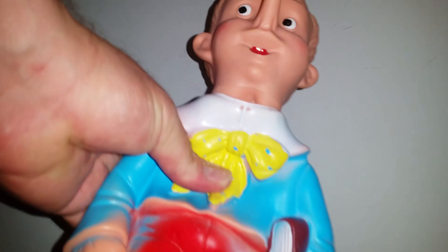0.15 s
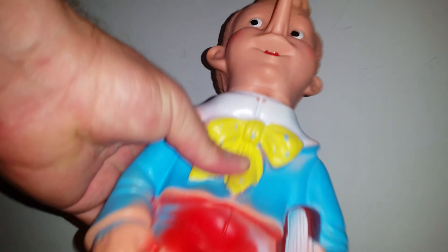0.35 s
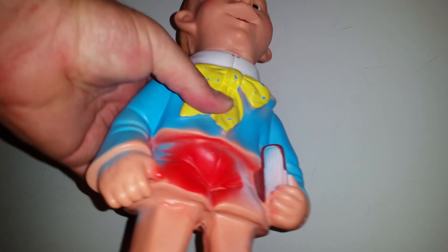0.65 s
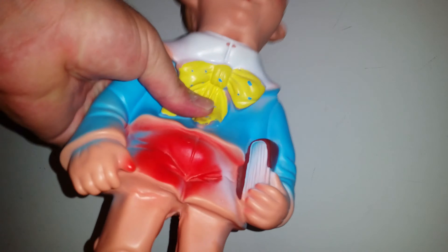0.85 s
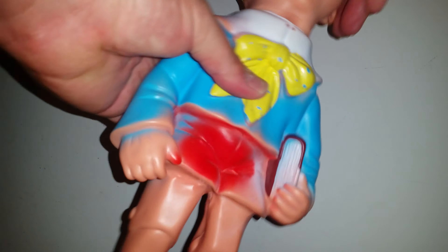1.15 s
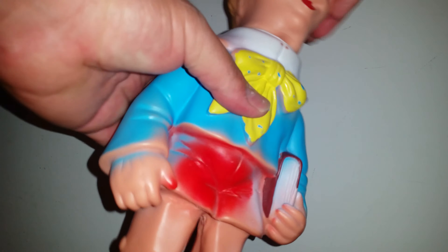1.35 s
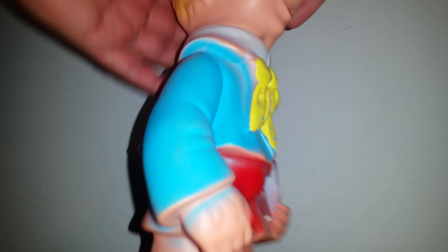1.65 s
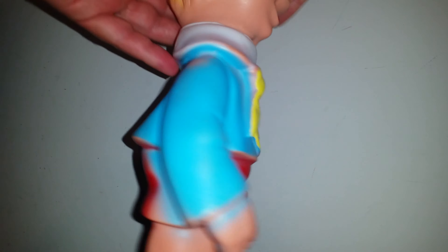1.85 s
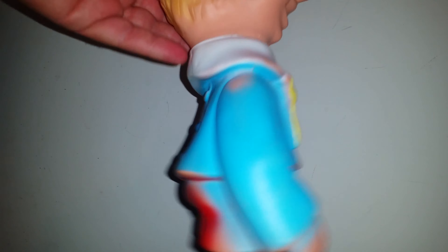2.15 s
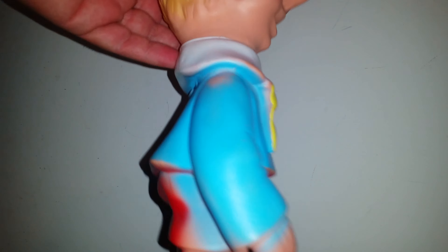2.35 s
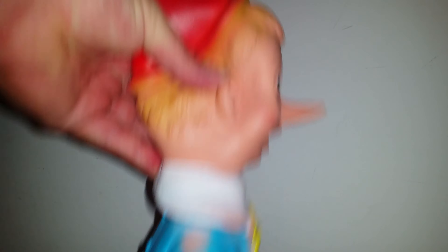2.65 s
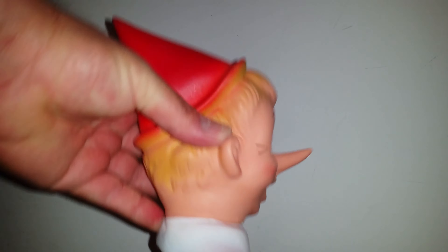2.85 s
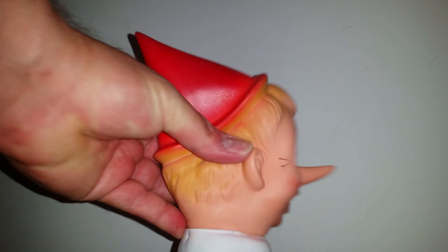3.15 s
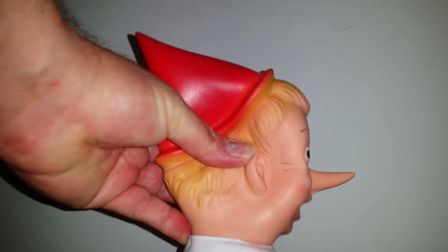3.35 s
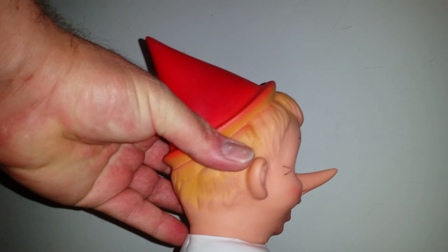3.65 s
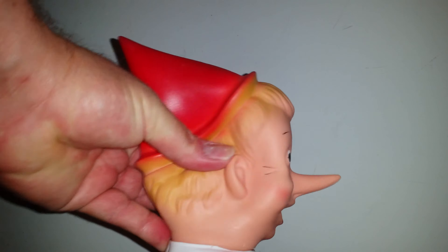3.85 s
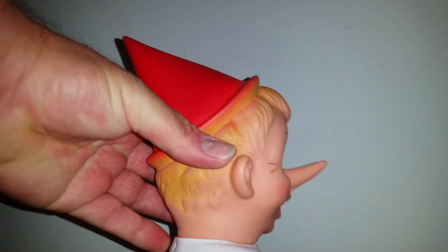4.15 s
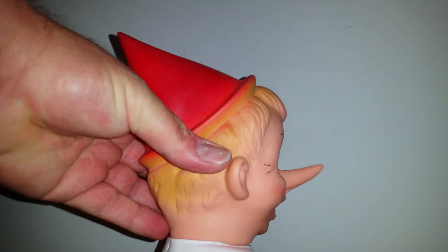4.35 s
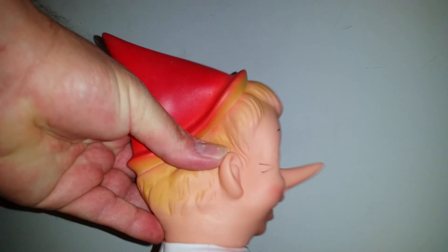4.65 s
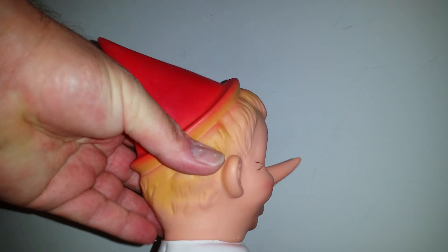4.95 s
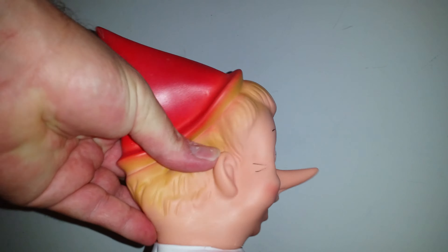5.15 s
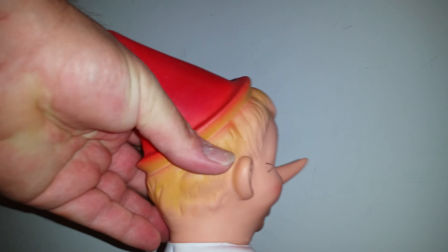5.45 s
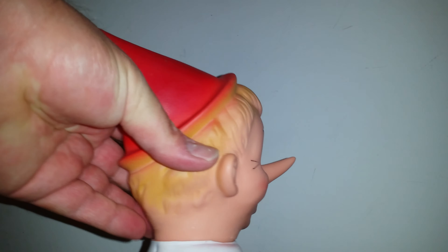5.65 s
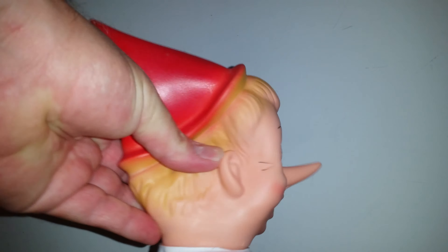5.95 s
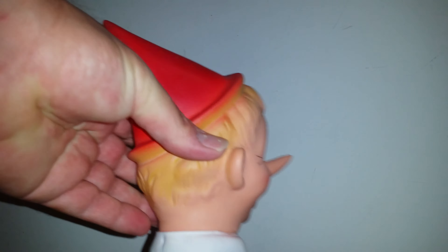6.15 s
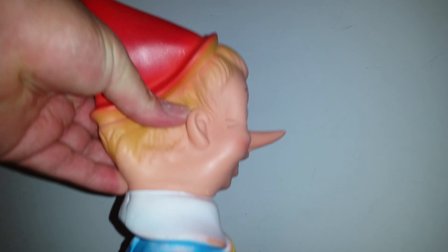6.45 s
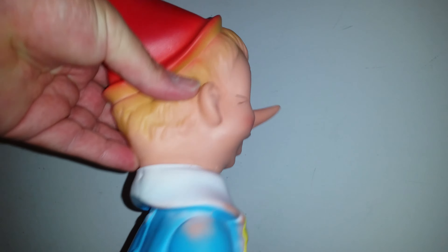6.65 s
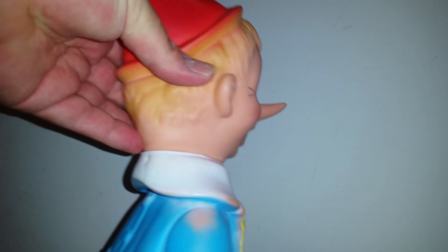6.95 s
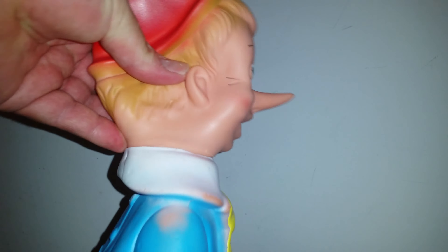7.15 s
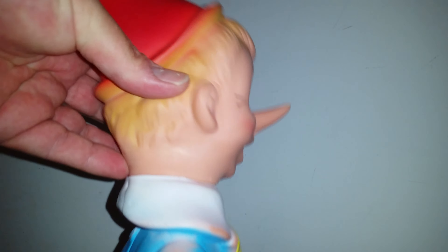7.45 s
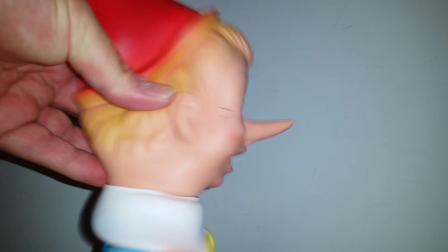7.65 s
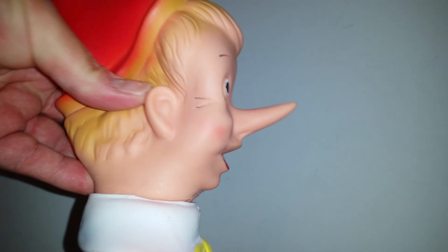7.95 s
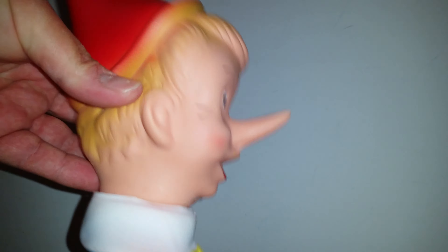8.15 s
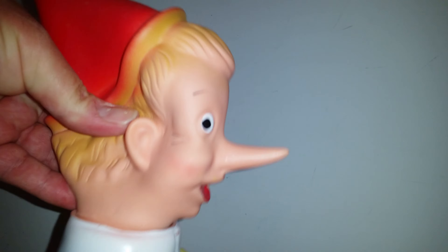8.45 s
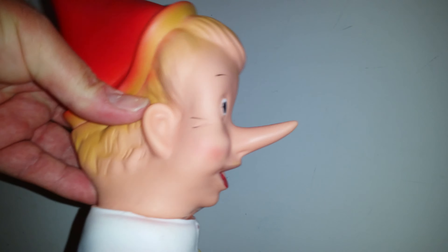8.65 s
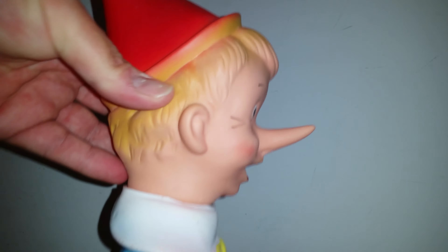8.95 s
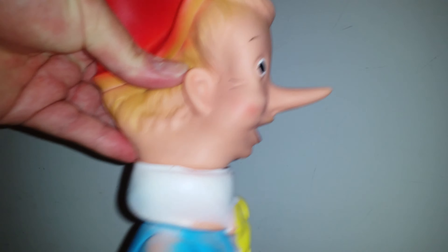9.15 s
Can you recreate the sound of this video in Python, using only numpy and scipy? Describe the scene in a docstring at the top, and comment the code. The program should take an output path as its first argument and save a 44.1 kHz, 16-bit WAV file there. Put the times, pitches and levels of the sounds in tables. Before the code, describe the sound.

A hand repeatedly squeezes a hollow rubber doll close to the microphones. About every two thirds of a second a short, raspy, hissing squeal jumps up in pitch and drops, followed at once by a lower, smoother whistle as air is sucked back. Squeaks in the middle are duller and more nasal, then turn shrill again. A few soft thumps and low grip rumble sit over faint room air and a thin hum.

```python
"""A hollow rubber doll is squeezed again and again in a small quiet room, heard by two close microphones.
Its reed is a stack of partials with chopped air noise: high and rough as air is pressed out, lower and
cleaner as the doll refills. A second tone arches over some strokes, and noise stirs in the hollow.
Decaying noise bursts are bumps on the rubber, and low noise is the shifting grip.
Behind them lie room air, as stereo noise, and an appliance's faint hum, as a sine."""
import sys
import numpy as np
from scipy import signal
from scipy.fft import rfft, irfft, next_fast_len
from scipy.io import wavfile
from scipy.ndimage import uniform_filter1d

SR = 44100
rng = np.random.default_rng(int(sys.argv[2]) if len(sys.argv) > 2 else 0)


def unload_audio(sound):
    """Save the sound as a 16-bit wav file, at the path given as the first command line argument."""
    columns = np.transpose(np.atleast_2d(sound))
    # keep every value between -1 and 1, then stretch to whole-number steps
    steps = np.round(np.clip(columns, -1, 1) * 32767)
    wavfile.write(sys.argv[1], SR, steps.astype(np.int16))


N = 409688  # length in samples
TOP_HZ = 15900  # upper edge of the sound


def undb(db):
    """Decibel law: 20 dB is a tenfold amplitude."""
    return 10 ** (np.asarray(db) / 20)


def rms(x):
    """Effective value: the root of the mean square."""
    return np.sqrt(np.mean(x ** 2) + 1e-20)


def ramp(x):
    """Saturation: hold a value between 0 and 1."""
    return np.clip(x, 0, 1)


def shape(hz, points):
    """Spectral envelope: read (frequency [Hz], level [dB]) points on a log-frequency axis."""
    point_hz, db = np.transpose(points)
    return np.interp(np.log(hz + 1e-3), np.log(point_hz), db)


def coloured(points, size):
    """Spectral shaping: white noise filtered to an envelope, with rms 1."""
    n = next_fast_len(size)
    gain = undb(shape(np.fft.rfftfreq(n, 1 / SR), points))
    x = irfft(rfft(rng.standard_normal(n)) * gain, n)[:size]
    return x / rms(x)


def wander(t, rate):
    """Random modulation, from slow drift to fast roughness: random values joined by lines, rate a second."""
    knots = np.arange(t[0], t[-1] + 1 / rate, 1 / rate)
    return np.interp(t, knots, rng.standard_normal(len(knots)))


def add(track, start, x):
    """Superposition: mix a sound into a track at a time in seconds."""
    i = max(int(start * SR), 0)
    track[i:i + len(x)] += x[:max(N - i, 0)]


# spectrum of the still room air: (frequency [Hz], level [dB per Hz])
AIR_SPECTRUM = [(15, -48), (25, 2), (286, -0.5), (462, -10), (709, -4), (1060, -15.5), (1540, -9.5),
                (1860, -29), (4040, -17.5), (4750, -30), (15000, -22)]
AIR_DB = -53.5  # of the common and of the opposed part
HUM_HZ, HUM_DB = 248.2, -60


def background():
    """Spatial coherence: room air is alike at both microphones in the bass; a thin hum is common to both."""
    t = np.arange(N) / SR
    mid, side = coloured(AIR_SPECTRUM, N), coloured(AIR_SPECTRUM, N)
    side = signal.sosfilt(signal.butter(1, 350, "high", fs=SR, output="sos"), side)
    hum = np.sqrt(2) * np.sin(2 * np.pi * HUM_HZ * t) * undb(HUM_DB + 2.0 * wander(t, 4.7))
    return undb(AIR_DB) * (mid + side * np.array([[1], [-1]])) + hum


GRIP_DB, GRIP_SPREAD_DB = -60.5, 3.5  # middle level of the grip's rumble and its random spread
# broad hump of a bump around its ring pitch: (frequency / ring pitch [ratio], level [dB per Hz])
BUMP_HUMP = [(.25, -25), (.8, 0), (1.25, 0), (2, -28), (10, -70)]
# the hand bumps the rubber: (time [s], level [dB], ring pitch [Hz], time to decay by 60 dB [s])
HAND_BUMPS = [(0.224, -38, 120, 0.14), (0.329, -31.5, 134, 0.063), (0.654, -36, 700, 0.072),
              (0.656, -31.5, 78, 0.17), (0.66, -32, 175, 0.095), (1.516, -36, 130, 0.073),
              (4.439, -40.5, 175, 0.25), (4.450, -41, 470, 0.15), (5.391, -25.5, 457, 0.089),
              (8.681, -41, 121, 0.11)]


def hand():
    """Damped resonance: dull bumps die away on the hollow rubber over the low rumble of the shifting grip."""
    out, t = np.zeros(N), np.arange(SR // 4) / SR
    for start, db, hz, t60 in HAND_BUMPS:
        ring = coloured([(hz * ratio, ring_db) for ratio, ring_db in BUMP_HUMP], len(t))
        onset = 1 - np.exp(-t / 0.00058)
        add(out, start, ring * undb(db - 60 * t / t60) * onset)
    grip = coloured([(25, -21), (80, 4.5), (170, 1), (300, -18.5), (520, -1.5), (1000, -23), (4000, -62)], N)
    return out + grip * undb(GRIP_DB + GRIP_SPREAD_DB * wander(np.arange(N) / SR, 14))


SLACK_HZ, TAUT_HZ = 787, 1545  # pitch of the reed at the weakest and at full pressure
CHOKE_DB = -38  # at full pressure a swing smaller than this is pressed shut
HELD_UNREST = 0.26  # share of the shaking that remains while the pitch is held
FLEX_DB, FLEX_PRESSURE_DB = 1.6, 2.3  # random spread of each partial, and its growth under pressure
# lowest partials as the doll is turned, re treble: (time [s], fundamental level [dB], octave level [dB])
LOW_COLOUR = [(1.3, -6, -14), (2.1, -10.5, -14.5), (2.75, -5.5, -14.5), (3.3, -2.5, -6.5), (5.4, -2, -6.5),
              (6.0, -3.5, -7.5), (6.6, -3.5, -9.5), (7.3, -1.5, -15), (8.3, -2.5, -9), (9.1, -3, -10.5)]
# air rushing through the slit: (frequency [Hz], level [dB per Hz])
RUSH_SPECTRUM = [(400, -52.5), (900, -2), (2500, 6), (4300, -4), (5600, 5.5), (6800, -14), (8000, 23),
                 (9300, -4), (12500, 10), (15500, -18)]


def squeak(start, pitch, loud, reed, nasal_db, rasp, spit_db, waver, flutter, rush_db, low_power,
           low_db=0, shake=0):
    """Reed oscillation: one stroke of air drives a stack of partials and a rush chopped once a cycle."""
    t = start + np.arange(len(pitch)) / SR
    swing = undb(loud)
    hz = uniform_filter1d(pitch, size=len(t) // 20)  # the air inside cushions every change
    ends = np.clip(np.minimum(t - t[0], t[-1] - t) / 0.0013, 0, 1)
    pressure = np.clip((hz - SLACK_HZ) / (TAUT_HZ - SLACK_HZ), .05, 1)

    # the reed is steadier when slack or taut, and shakes on the way between, most while it glides
    glide = np.abs(np.gradient(hz))
    gliding = HELD_UNREST + (1 - HELD_UNREST) * np.sqrt(glide / glide.max())
    unrest = 0.458 + 4.82 * pressure * (1 - pressure) * gliding
    hz = hz * (1 + unrest * (waver * wander(t, 110.1) + rasp * wander(t, 900)))
    phase = 2 * np.pi * np.cumsum(hz) / SR

    # each partial swells and fades on its own as the rubber flexes, more so under pressure
    k = np.arange(3, 21)[:, None]
    flex_spread = FLEX_DB + FLEX_PRESSURE_DB * np.sqrt(pressure)
    flex_db = flex_spread * np.array([wander(t, 44.6) for _ in k])
    partials = undb(shape(k * hz, reed) + flex_db) * np.sin(k * phase) * (k * hz < TOP_HZ)
    high = k * hz > 5700
    treble = (partials * high).sum(0)
    middle = (partials * ~high).sum(0)
    treble /= np.sqrt(uniform_filter1d(treble ** 2, size=400) + 1e-9)

    when, *columns = np.transpose(LOW_COLOUR)
    tone, octave = undb([np.interp(t.mean(), when, c) for c in columns]) * undb(low_db)
    low = np.sqrt(2) * (tone * np.sin(phase) + octave * np.sin(2 * phase))
    low += undb(nasal_db) * middle / rms(middle)
    # a rough swing is also uneven in size, which makes the low partials hoarse
    low *= (1 + shake * unrest * wander(t, 800)) / np.sqrt(1 + (shake * unrest) ** 2 / 2)
    # gentle blowing loses the treble sooner than the low partials
    soft = swing * (swing.max() / swing) ** ((1 - low_power) * (1 - pressure))
    soft *= rms(swing) / rms(soft)

    # the tongue slaps unevenly under pressure
    uneven = 2 * np.tanh((wander(t, 180.7) + 0.18 * wander(t, 1100)) / 2)
    slap = np.exp(flutter * np.sqrt(pressure) * uneven)
    # air spits past the swinging tongue, and still hisses through when a hard squeeze chokes it
    flow = undb(spit_db) * swing * pressure ** 0.26 + undb(rush_db) * pressure
    rush = flow * coloured(RUSH_SPECTRUM, len(t)) * (1 + 0.74 * np.cos(phase))
    free = np.clip(1 - undb(CHOKE_DB) * pressure / swing, 0, 1)
    return ends * (free * (swing * treble + soft * low) * slap / rms(slap) + rush)


SQUEEZE_FOOT_HZ, SQUEEZE_KNEE_HZ = 859, 929.6  # slow creep beneath the steep rise to the top pitch
SQUEEZE_ONSET_DB = -16.5  # relative level at the first instant
SQUEEZE_ATTACK_S, USUAL_RISE_S = 0.048, .1  # attack at the usual rise; a quicker squeeze speaks much sooner
SQUEEZE_END_DB, SQUEEZE_FADE_S = -50.5, 0.033
HOLD_IN_S, HOLD_OUT_S = 0.017, 0.016  # time for the level shift to set in and to pass off


def squeeze(length, rise, fall, top_hz, db, hold_db):
    """Pressure-controlled pitch: pressure builds, holds and drops; the level shifts up or down in the hold."""
    t = np.arange(0, length, 1 / SR)
    press = ramp(np.minimum(t / rise, (length - t) / fall))
    creep = (SQUEEZE_KNEE_HZ - SQUEEZE_FOOT_HZ) * press
    climb = (top_hz - SQUEEZE_KNEE_HZ) * np.sin(np.pi / 2 * press ** 2) ** 2
    attack = SQUEEZE_ONSET_DB * ramp(1 - t / (SQUEEZE_ATTACK_S * (rise / USUAL_RISE_S) ** 2))
    fade = SQUEEZE_END_DB * ramp(1 - (length - t) / SQUEEZE_FADE_S)
    held = ramp((t - rise) / HOLD_IN_S) * ramp((length - fall - t) / HOLD_OUT_S + .5)
    return SQUEEZE_FOOT_HZ + creep + climb, db + attack + fade + hold_db * held


RASP, SPIT_DB = 0.018, -6  # cycle-to-cycle pitch spread and spitting air at roughness 1
# strength of the reed's partials, air going out: (frequency [Hz], level [dB])
REED_OUTWARD = [(2700, 3.5), (3600, -2.5), (4600, 0.5), (5600, -9), (6500, -5), (7300, 4.5), (8000, 13),
                (9000, -2.5), (10500, -3.5), (12500, -0.5), (15300, -2)]
# air pressed out: (start [s], length [s], rise [s], fall [s], top pitch [Hz], treble level [dB],
# level shift while the top pitch is held [dB], partials from the third up to 5.7 kHz re treble [dB],
# roughness [1 = fully rough])
OUT_STROKES = [ (0.085, 0.24, .061, 0.079, 1574, -24, -17, -13, .9),
               (0.811, .212, .045, 0.073, 1548, -22.5, -14, -11, 0.96),
               (1.432, 0.18, 0.035, 0.061, 938.5, -23.5, 2, -12, 0.4),
               (1.976, 0.2, 0.061, 0.095, 1553, -18, -2, -15.5, 0.98),
               (2.643, 0.2, 0.079, 0.096, 1500, -21.5, -1, -15.5, 1.04),
               (3.180, 0.26, 0.099, 0.099, 1516, -20, -1.5, -7.5, .75),
               (3.842, 0.21, 0.083, 0.097, 1467, -21, -4, -4.5, .8),
               (4.464, 0.21, 0.11, 0.091, 1383, -21.5, 2, -2.5, 0.6),
               (5.116, 0.23, 0.12, 0.093, 1019, -24, 7, -1, 0.38),
               (5.777, 0.24, .100, 0.12, 1155, -23.5, 11, -3, 0.32),
               (6.39, .215, .105, .109, 1113, -21, 2, -13, 0.64),
               (7.01, 0.25, 0.098, .128, 1410, -22, -1, -12, 0.71),
               (7.68, 0.25, 0.077, 0.11, 1500, -20, -1.5, -14.5, 0.84),
               (8.385, .241, .073, 0.098, 1519, -20, -0.5, -14.5, 0.83),
               (9.061, 0.23, .077, 0.081, 1583, -20.5, -14, -14.5, 1.1), ]


def squeezes():
    """Outward reed flow: rough squeals, returned with the flow amplitude that stirs the hollow."""
    out, flow = np.zeros(N), np.zeros(N)
    for start, *stroke, nasal_db, rough in OUT_STROKES:
        pitch, loud = squeeze(*stroke)
        spit_db = SPIT_DB + 20 * np.log10(max(rough, .01))
        squeal = squeak(start, pitch, loud, REED_OUTWARD, nasal_db, rasp=RASP * rough, spit_db=spit_db,
                        waver=0.01037 * rough, flutter=0.63, rush_db=-43.5, low_power=0.46,
                        shake=.25 * rough)
        add(out, start, squeal)
        add(flow, start, undb(loud))
    return out, flow


RELEASE_RISE_S, RELEASE_START_HZ, RELEASE_END_HZ = .085, 801, 734.4
RELEASE_ONSET_DB, RELEASE_ATTACK_S = -17, .022  # level at the first instant; time until the reed speaks fully
RELEASE_FULL_HZ, RELEASE_END_DB = 901.6, -22  # below this pitch the note weakens, by this at the end pitch


def release(length, fall, first_hz, last_hz, sag_hz, db):
    """Elastic recoil: suction sets in, holds while the rubber unfolds and runs out, lowering pitch and level."""
    t = np.arange(0, length, 1 / SR)
    held = ramp((t - RELEASE_RISE_S) / max(length - fall - RELEASE_RISE_S, .01))
    hz = first_hz + (last_hz - first_hz) * held - sag_hz * np.sin(np.pi * held) ** 2
    scoop = (first_hz - RELEASE_START_HZ) * ramp(1 - t / RELEASE_RISE_S) ** 2.5  # slides up into its pitch
    hz = hz - (last_hz - RELEASE_END_HZ) * ramp(1 - (length - t) / fall) ** 1.3
    attack = RELEASE_ONSET_DB * ramp(1 - t / RELEASE_ATTACK_S)
    weak = ramp((RELEASE_FULL_HZ - hz) / (RELEASE_FULL_HZ - RELEASE_END_HZ)) ** 1.52
    return hz - scoop, db + attack + RELEASE_END_DB * weak


# strength of the reed's partials, air coming in: (frequency [Hz], level [dB])
REED_INWARD = [(2700, -5.5), (3600, -15), (4600, -15.5), (5700, -33), (6500, -10.5), (7300, 2), (8200, 11),
               (9000, 5.5), (10200, 2.5), (11600, -1.5), (13300, -7), (15300, -1)]
# air drawn back in: (start [s], length [s], fall [s], pitch after the rise [Hz],
# pitch before the fall [Hz], sag between them [Hz], treble level before a common trim [dB],
# partials from the third up to 5.7 kHz re treble [dB])
IN_STROKES = [ (0.339, 0.35, 0.16, 986.4, 959, -15, -19, -17),
              (1.022, 0.37, 0.22, 980, 973.5, -6.5, -18.5, -17.5),
              (1.63, 0.31, 0.14, 931.6, 951.5, -2.5, -17.5, -17),
              (2.184, 0.33, 0.16, 952, 955, 20, -17, -16.5), (2.844, 0.28, 0.18, 950, 975, -4, -19.5, -10),
              (3.443, 0.3, 0.16, 982, 1005, 0, -19, -5.5), (4.062, 0.3, 0.2, 942.5, 982, 9, -20, -5.5),
              (4.694, 0.28, 0.19, 943, 969, -3, -19, -4.5), (5.365, 0.26, 0.18, 946, 981, -11, -19.5, -4),
              (6.034, 0.29, .142, 919, 958, 2.5, -19, -7.5), (6.634, 0.29, 0.16, 896, 946.5, -12, -19, -17),
              (7.277, 0.36, 0.097, 901.4, 906.7, 26.5, -18, -16.5),
              (7.952, 0.39, 0.082, 935, 880, 20.5, -18, -17.5),
              (8.636, .383, 0.13, 928.7, 916.7, 19.5, -18, -19), ]


def releases():
    """Inward reed flow: lower, cleaner notes with little pitch shake or air noise."""
    out = np.zeros(N)
    trim = undb(-1.27)
    for start, *stroke, nasal_db in IN_STROKES:
        note = squeak(start, *release(*stroke), REED_INWARD, nasal_db, rasp=.0008, spit_db=-58,
                      waver=.0028, flutter=0.015, rush_db=-62, low_power=0.99,
                      low_db=(0, -1))  # fundamental, octave
        add(out, start, trim * note)
    return out


SPLIT_FOOT_HZ = 930


def split(length, top_hz, db):
    """Parabolic glide: the second tone's pitch makes one arch at an even level."""
    u = np.arange(0, length, 1 / SR) / length
    arch = 1 - (2 * u - 1) ** 2
    return SPLIT_FOOT_HZ + arch * (top_hz - SPLIT_FOOT_HZ), np.full(len(u), db)


# under strong flow the reed breaks into a second tone: (start [s], end [s], top pitch [Hz], level [dB])
SECOND_TONES = [(0.387, 0.556, 1074, -29.5), (1.052, 1.204, 1091, -27), (1.457, 1.583, 1133, -23.5),
                (3.23, 3.388, 1283, -27.5), (3.489, 3.656, 1160, -28), (4.118, 4.237, 1030, -31.5),
                (4.487, 4.648, 1534, -35.5), (5.184, 5.323, 1680, -27.5), (5.815, 5.978, 1845, -30.5),
                (6.443, 6.561, 1684, -28.5)]


def second_tones():
    """Biphonation: the reed sounds a second, independent pitch beside the first."""
    out = np.zeros(N)
    for start, end, top_hz, db in SECOND_TONES:
        tone = squeak(start, *split(end - start, top_hz, db), REED_OUTWARD, nasal_db=-11.5, rasp=0.0022,
                      spit_db=-46, waver=0.0035, flutter=.03, rush_db=-62, low_power=0.17)
        add(out, start, tone)
    return out


VENT_HZ = 693  # the small vent radiates little below this
HOLLOW_DB = -35.5  # relative to the treble
# the moving air stirs the hollow of the doll: (frequency [Hz], level [dB per Hz])
HOLLOW_SPECTRUM = [(200, -23), (370, -4), (460, 0), (560, -5), (900, -35)]


def doll():
    """Aperture radiation: the vent passes the reed's upper range; outward air also stirs the hollow."""
    out, flow = squeezes()
    out = out + releases() + second_tones()
    hollow = undb(HOLLOW_DB) * flow * coloured(HOLLOW_SPECTRUM, N)
    return signal.sosfilt(signal.butter(6, VENT_HZ, "high", fs=SR, output="sos"), out) + hollow


def reflections(t, t60, gap, count):
    """Exponential decay: echoes with unit energy; a higher odd count makes them sparser."""
    x = rng.standard_normal(len(t)) ** count * undb(-60 * t / t60) * (t > gap)
    return x / np.linalg.norm(x)


# how much more the left microphone hears of the doll: (frequency [Hz], left minus right [dB])
MICROPHONE_SHADE = [(900, 10), (2000, 7.5), (4000, 3.5), (6300, 5), (7300, 13), (8200, 19.5), (10000, 15),
                    (11500, 8), (13000, 2), (15000, -8)]


def room(x, wet_db, t60, near_db, near_t60, near_hz):
    """Reflection and shading: treble glances off moving hand and doll, then a short tail; one side is shaded."""
    t = np.arange(SR // 2) / SR
    n = next_fast_len(N + len(t))
    lean = undb(shape(np.fft.rfftfreq(n, 1 / SR), MICROPHONE_SHADE))
    small = signal.butter(1, near_hz, "high", fs=SR, output="sos")  # small surfaces return only short waves
    hop = SR // 7
    out = []
    for gain, lag in ((lean, 0), (1, 3)):  # left, right; lag in samples
        heard = np.roll(x, lag)
        for i in range(0, N, hop):  # each pose fades into the next and has its own echoes
            piece = x[i:i + 2 * hop]
            piece = piece * np.sin(np.pi * np.arange(len(piece)) / (2 * hop))
            echoes = signal.sosfilt(small, reflections(t[:hop], near_t60, gap=.001, count=3))
            add(heard, i / SR, undb(near_db) * signal.fftconvolve(piece, echoes))
        tail = signal.fftconvolve(x, reflections(t, t60, gap=0.0074, count=1))[:N]
        heard = (heard + undb(wet_db) * tail) / np.sqrt(1 + undb(near_db) ** 2 / 2)
        balance = gain * np.sqrt(2 / (1 + lean ** 2))  # keeps the summed power of both sides
        out.append(irfft(rfft(heard, n) * balance, n)[:N])
    return np.array(out)


def scene():
    """Linear superposition: the doll in its room, the hand and the background."""
    in_room = room(doll(), wet_db=-4, t60=0.19, near_db=7.0, near_t60=0.13, near_hz=3540)
    return in_room + hand() + background()


PEAK_LIMIT = .9  # full scale = 1


def record(dry):
    """Saturation and band-limiting: the very highest peaks are rounded and the top is cut."""
    rounded = dry / (1 + (dry / PEAK_LIMIT) ** 8) ** (1 / 8)
    return signal.sosfilt(signal.ellip(10, .2, 80, TOP_HZ, fs=SR, output="sos"), rounded)


dry = scene()
out = record(dry)
unload_audio(out)
```